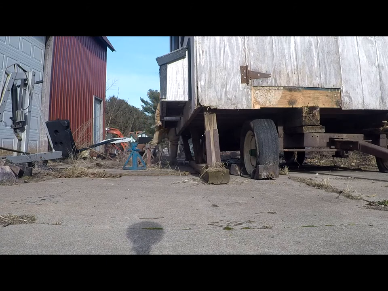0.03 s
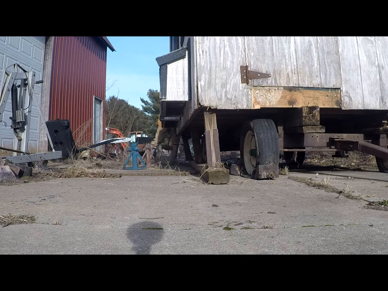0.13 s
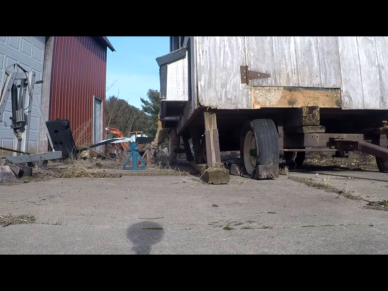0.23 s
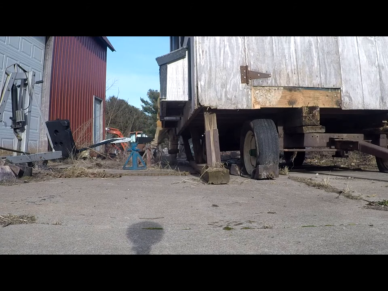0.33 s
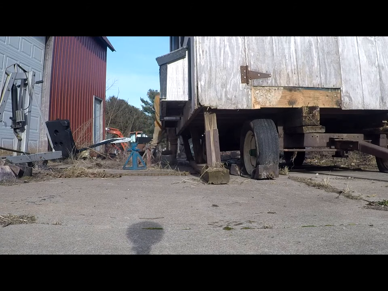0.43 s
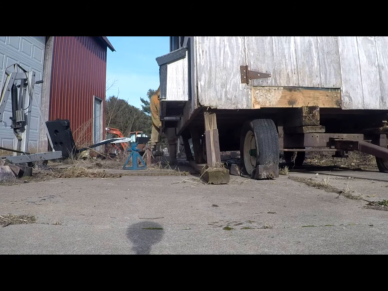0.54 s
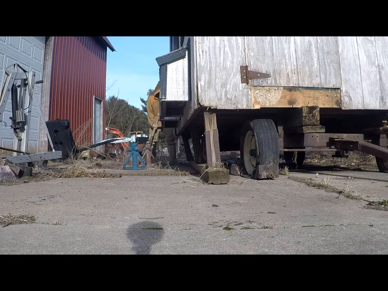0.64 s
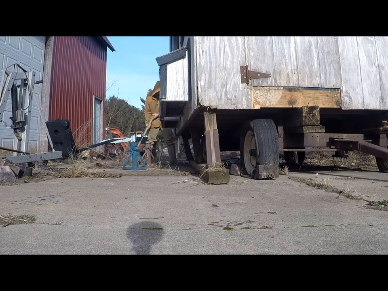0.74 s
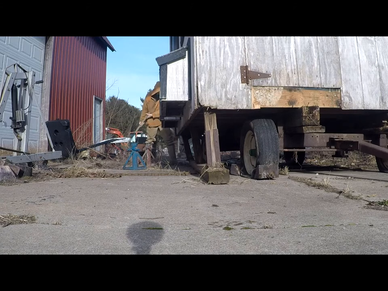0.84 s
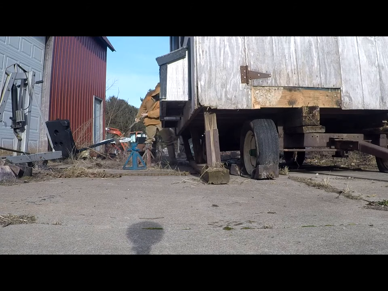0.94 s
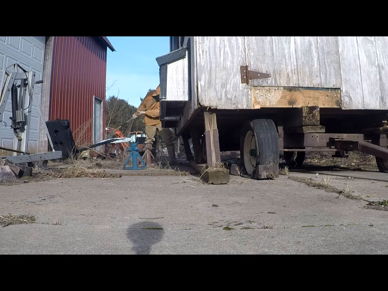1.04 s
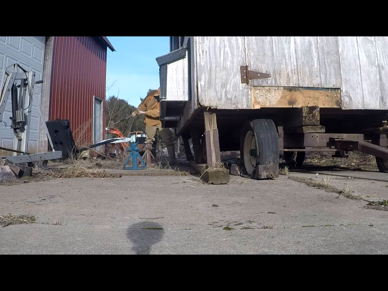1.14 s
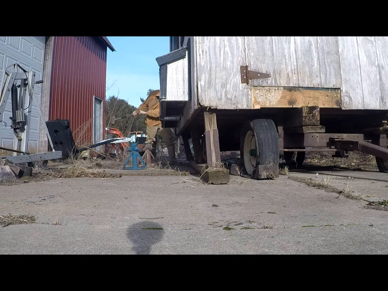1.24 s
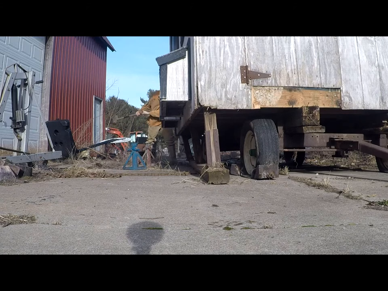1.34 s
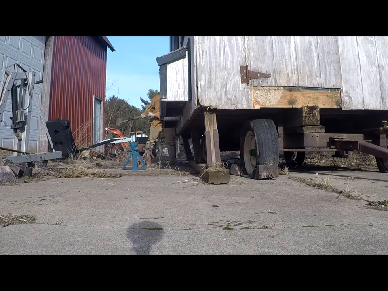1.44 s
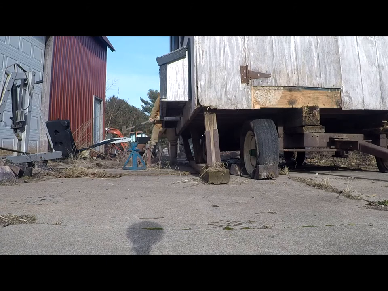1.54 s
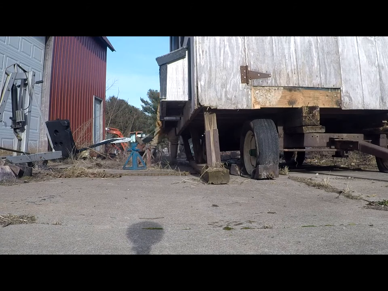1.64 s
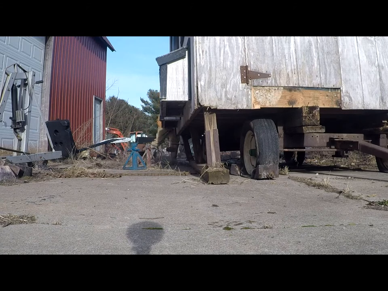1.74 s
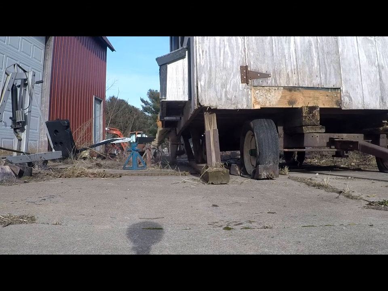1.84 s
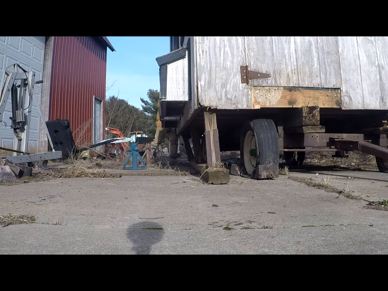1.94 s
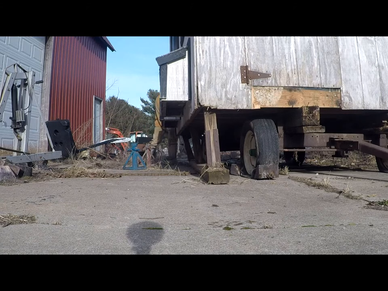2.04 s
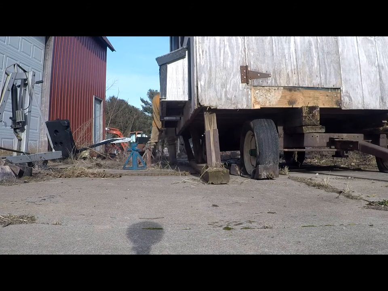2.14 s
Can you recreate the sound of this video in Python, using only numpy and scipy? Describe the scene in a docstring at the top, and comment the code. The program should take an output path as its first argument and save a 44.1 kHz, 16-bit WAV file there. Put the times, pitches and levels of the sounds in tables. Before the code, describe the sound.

A heavy jack clanks under a wooden building in an open yard. Soft hiss and faint ticks lead to a loud, overloaded steel clank with timber thud at 0.25 s, then a bright clink at 0.34 and small rattles at 0.41-0.46. Dull echoes fade; the ducked hiss swells back amid faint ticks from 0.8 to 1.7. A second, slightly softer, bassier clank lands at 1.84 s.

```python
"""Jacking up a wooden building in a farmyard

A long-handled jack lifts the building; twice the load drops onto the catch. Each drop is a low push, then a steel clank
of noise bands and struck modes that shakes the timber and overloads the recorder. Loose parts clink and tick as the
handle is worked, and barns and trees return dull echoes as filtered, scattered copies. The recorder's gain control
ducks at the clanks, so the open-air hiss sinks and, after the first, swells slowly back."""
import sys
import numpy as np
from scipy import signal
from scipy.io import wavfile
from scipy.ndimage import minimum_filter1d

SR = 44100
rng = np.random.default_rng(int(sys.argv[2]) if len(sys.argv) > 2 else 0)


def wrap_up_sound(samples):
    """Save the sound to the file named by the first command line argument, as 16-bit audio."""
    columns = np.atleast_2d(samples).T
    # keep every value between -1 and 1, then stretch to whole-number steps
    tamed = np.clip(columns, -1, 1)
    steps = np.round(tamed * 32767).astype(np.int16)
    wavfile.write(sys.argv[1], SR, steps)


N = 97020
T = np.arange(N) / SR   # seconds


def from_db(db):
    """Decibels to gain."""
    return 10 ** (np.asarray(db) / 20)


def rms_one(x):
    """Scale to unit rms."""
    return x / np.sqrt(np.mean(x ** 2) + 1e-20)


def at_hz(table, hz):
    """Read each column of a table at one frequency, interpolating over log frequency."""
    freqs, *columns = np.transpose(table)
    return [np.interp(np.log(hz), np.log(freqs), column) for column in columns]


def filtered(x, hz, kind, order=2):
    """Butterworth filter."""
    sections = signal.butter(order, np.clip(hz, 1, .45 * SR), kind, fs=SR, output="sos")
    return signal.sosfilt(sections, x + 1e-18)


def noise_bands():
    """Half-octave bands of noise as (centre Hz, band), unit power per octave."""
    edges = 22 * 2 ** (np.arange(20) / 2)
    for low, high in zip(edges, edges[1:]):
        noise = rng.standard_normal(N + SR // 2)
        band = filtered(noise, [low, high], "band", order=3)[-N:]   # drop the filter's settling
        yield np.sqrt(low * high), rms_one(band) / np.sqrt(2)


def dying(start, t60):
    """Envelope that jumps to 1 and falls 60 dB in each t60 seconds."""
    return (T >= start) * np.exp(-np.log(1000) * np.clip((T - start) / t60, 0, 10))


def ring(start, hz, t60):
    """One struck mode: a sine that dies away exponentially."""
    return dying(start, t60) * np.sin(2 * np.pi * hz * (T - start))


def air():
    """Open air at the microphone: steady hiss and rumble over slow swings of pressure."""
    # Each row: frequency in Hz, level in dB per octave band.
    air_spectrum = [(30, -52), (70, -48), (150, -47), (300, -53.5), (600, -53.5), (1200, -53.5),
                    (2400, -55), (4800, -58), (9000, -58), (15000, -60.5)]
    sway_db, sway_hz = -26.5, 6.3   # rms level, upper edge
    hiss = sum(from_db(at_hz(air_spectrum, hz)[0]) * band for hz, band in noise_bands())
    sway = rms_one(filtered(rng.standard_normal(2 * N), sway_hz, "low", order=3)[N:])
    return hiss + from_db(sway_db) * sway


def linkage():
    """Brief rubs of the linkage, and one ring of the handle: dying noise, each passed twice through one
    resonance."""
    # Small ticks and scrapes, and at 0.408 s the handle's ring near 2.4 kHz. Each row: start in seconds, level
    # in dB, centre in Hz, # sharpness Q of each pass (no lower than 0.5), t60 in seconds.
    ticks = [(0.0775, -39, 1760, 1.4, 0.08), (0.095, -47, 2340, 2, 0.3), (.135, -46, 3120, 13, 0.11),
             (.407, -27.5, 7950, 2.6, 0.13), (.408, -20, 2430, 1.7, 0.27), (.803, -68, 7500, 1.5, 0.045),
             (.829, -46.5, 5000, 0.73, 0.032), (.921, -47, 13600, 35, 0.087),
             (1.052, -42, 3663, 0.51, 0.08), (1.055, -50, 8500, 8.7, 0.091), (1.0754, -40, 3370, 0.86, .03),
             (1.1294, -60, 14200, 20, .08), (1.188, -43, 2930, 7.3, 0.047), (1.3535, -49, 6100, .7, 0.077),
             (1.365, -45, 2660, 3.3, 0.16), (1.4024, -39.5, 1750, 2.3, 0.11),
             (1.427, -48.5, 2350, 1.1, 0.055), (1.679, -43.5, 2040, 1.24, 0.14)]
    out = np.zeros(N)
    for start, db, hz, q, t60 in ticks:
        peak = signal.iirpeak(hz, max(q, .5), fs=SR)
        once = signal.lfilter(*peak, rng.standard_normal(N))
        rub = signal.lfilter(*peak, once)
        out += from_db(db) * dying(start, t60) * rms_one(rub)
    return out


def clank(start, level_db, tilt_db, bass_db, mid_db, mid_hz, rebound_s):
    """A low push, the crack of steel, then the modes of jack and timber dying away into the yard."""
    # Dense ringing of jack and timber.
    # Each row: frequency in Hz, level in dB per octave band before the blow's colour, t60 in seconds.
    body = [(40, -6.5, .55), (71, -6, 0.36), (129.6, -2, .42), (270, 1, 0.39), (520, -0.5, 0.27),
            (1100, 0.5, 0.24), (1970, -4, 0.29), (4430, -7, .255), (8200, -9.5, 0.21), (11000, -21, 0.2),
            (15000, -29, .2)]
    # Lingering sound of the yard. Each row: the same columns as the body.
    yard = [(40, -25, 2.2), (140, -21.5, 1.78), (300, -24, 1.1), (970, -28.5, 0.59), (3000, -31, 0.25),
            (8000, -41.5, .5), (15000, -54, .4)]
    # Strongest modes of the loaded jack.
    # Each row: frequency in Hz, mean level in dB before the blow's colour, t60 in seconds.
    jack_modes = [(98.2, 1, .35), (217.1, 7, 0.37), (277.1, 24, 0.11), (304.9, 12.5, .2), (354, 10, 0.22),
                  (459.5, 11, 0.15), (517.2, 5.5, .17), (585, 10.5, 0.16), (684.6, 7.5, 0.17),
                  (811.8, 3.5, 0.16), (947.7, 1.5, .2), (980, 5, 0.095), (1027.2, 9.5, 0.12),
                  (1104, 9, .18), (1159.5, 8, 0.14), (1545, 1.5, .19), (1951, 1, 0.18), (2227, 2.5, .2),
                  (2606, -6, 0.067)]
    crack_db, crack_t60_s, crack_hz = 4.5, .04, 1100   # steel on steel
    push_lead_s, push_hz, push_db = .0075, 205, -3.5   # the frame gives just before the blow
    rebound_db = -0.5   # the load bounces and strikes again
    rise_cycles = 0.53   # build-up time constant, so deep resonances take longer
    boom_rise_s = 0.015   # the timber takes a moment to swing
    ring_hz, ring_db, ring_t60_s = 7510, -51, 2

    def colour(hz):
        """How hard this blow excites one frequency."""
        treble = tilt_db * np.log2(max(hz / crack_hz, 1))
        bass = bass_db * (hz < push_hz)
        mid = mid_db * np.exp(-np.log2(hz / mid_hz) ** 2)
        return from_db(treble + bass + mid)

    age = np.maximum(T - start, 0)
    crack = rms_one(filtered(rng.standard_normal(N), [crack_hz / 2, crack_hz * 2], "band"))
    out = from_db(crack_db) * dying(start, crack_t60_s) * crack

    for hz, band in noise_bands():
        body_db, body_t60 = at_hz(body, hz)
        yard_db, yard_t60 = at_hz(yard, hz)
        rebound = from_db(rebound_db) * dying(start + rebound_s, body_t60)
        struck = np.hypot(dying(start, body_t60), rebound)
        decay = np.hypot(from_db(body_db) * struck, from_db(yard_db) * dying(start, yard_t60))
        rise = 1 - np.exp(-age * hz / rise_cycles)
        out += colour(hz) * band * decay * rise

    swing = 1 - np.exp(-age / boom_rise_s)
    for k, (hz, db, t60) in enumerate(jack_modes):
        mode_gain = from_db(db + rng.normal(0, 1))
        out += (-1) ** k * colour(hz) * mode_gain * swing * ring(start, hz, t60)   # alternating polarity

    lead = np.maximum(T - start + push_lead_s, 0)
    push_envelope = np.minimum(lead / push_lead_s, 1) * np.exp(-age / push_lead_s)
    out += from_db(push_db) * push_envelope * np.sin(2 * np.pi * push_hz * lead)
    out += from_db(ring_db) * ring(start, ring_hz, ring_t60_s)
    return from_db(level_db) * out


def clanks():
    """The load drops onto the catch, each drop with its own weight and colour."""
    # Each row: start in seconds, level in dB, treble tilt in dB per octave, bass ring in dB,
    # mid ring in dB, centre of the mid ring in Hz, rebound delay in seconds.
    drops = [(0.2520, 0.5, 1, -0.5, -1, 480, .009), (1.8444, -2.5, 0.5, 2.5, 1.5, 527, 0.011)]
    return sum(clank(*row) for row in drops)


def clinks(hits, modes, contact_hz):
    """A small steel part: a short rattling contact and its ringing modes."""
    contact_db, contact_t60_s = -3, 0.077   # level of the noise before its band filter
    out = np.zeros(N)
    for start, db in hits:
        rattle = filtered(rng.standard_normal(N), [contact_hz / 2, contact_hz * 2], "band")
        contact = from_db(contact_db) * dying(start, contact_t60_s) * rattle
        ringing = sum(from_db(mode_db) * ring(start, hz, t60) for hz, mode_db, t60 in modes)
        out += from_db(db) * (contact + ringing)
    return out


def catch():
    """The catch drops in and rings as a small steel part."""
    # Each row: start in seconds, level in dB.
    catch_hits = [(.3401, -6.5)]
    # Each row: frequency in Hz, level in dB relative to the hit, t60 in seconds.
    catch_modes = [(3110, -10.5, 0.14), (3580, -15, .18), (4500, -4, 0.14), (4585, -2.5, 0.098),
                   (6465, -17, 0.17), (8540, -2.5, 0.05), (8790, -6.5, 0.13), (12000, -13, 0.17),
                   (12400, -9, .13), (13870, -23, 0.2)]
    return clinks(catch_hits, catch_modes, contact_hz=6450)


def handle():
    """The handle knocks in its socket and rings in a few modes."""
    # Each row: start in seconds, level in dB.
    handle_hits = [(.4075, -27), (.4628, -18.5), (.7165, -43.5)]
    # Each row: frequency in Hz, level in dB relative to the hit, t60 in seconds.
    handle_modes = [(2753, -12.5, 0.41), (4150, -8.5, 0.11), (5320, -7.5, 0.083)]
    return clinks(handle_hits, handle_modes, contact_hz=3130)


def echoes(x):
    """Each far surface returns a dull copy, scattered by a dying burst of noise."""
    # Far walls and trees. Each row: delay in seconds, level in dB before the band edges are cut,
    # low edge in Hz, high edge in Hz, scatter t60 in seconds.
    far_surfaces = [(.266, -35, 480, 1200, 0.11), (0.347, -42.5, 950, 1900, 0.078),
                    (.408, -38.5, 480, 890, .24), (0.523, -50.5, 680, 1400, .07),
                    (.615, -38, 418, 592, 0.29), (.665, -35, 110, 190, 0.27), (.768, -38.5, 430, 604, .2),
                    (.8, -38.5, 109.8, 190, 0.17), (0.888, -49, 400, 500, .3)]
    response = np.zeros(N)
    for delay, db, low_hz, high_hz, t60 in far_surfaces:
        scatter = rng.standard_normal(N) * dying(delay, t60)
        scatter /= np.linalg.norm(scatter)   # unit energy
        dulled = filtered(scatter, high_hz, "low")
        response += from_db(db) * filtered(dulled, low_hz, "high")
    return signal.fftconvolve(x, response)[:N]


def scene():
    """Open air, jack and echoes as they reach the microphone; only the clanks are echoed."""
    blows = clanks()
    return (air() + linkage() + blows + catch() + handle() + echoes(blows))[None]


def gain_control(x):
    """Loud peaks pull the gain down; it holds, then creeps back."""
    threshold_db, depth_db = 2, 21.5   # depth is the deepest cut
    attack_s, hold_s, release_s = .0095, 0.26, .38
    level_db = 20 * np.log10(np.abs(x) + 1e-9)
    excess = np.clip(level_db - threshold_db, 0, depth_db)
    # Running maximum over the hold time just past
    hold = 2 * int(hold_s * SR / 2) + 1
    held = -minimum_filter1d(-excess, hold, origin=hold // 2, mode="constant")
    # The cut in dB decays exponentially unless a louder peak renews it
    fade = np.exp(-T / release_s)
    cut_db = np.maximum.accumulate(held / fade) * fade
    pole = np.exp(-1 / (attack_s * SR))
    return x * from_db(-signal.lfilter([1 - pole], [1, -pole], cut_db))


def record(dry):
    """The recorder: gain control, soft overload on the clanks, and a steep top cut."""
    ceiling, cutoff_hz = .87, 15300   # ceiling as a fraction of full scale
    x = gain_control(dry[0]) / ceiling
    clipped = ceiling * x / (1 + x ** 4) ** (1 / 4)
    top_cut = signal.firwin(161, cutoff_hz, window="blackman", fs=SR)
    return signal.fftconvolve(clipped, top_cut, "same")[None]


dry = scene()
out = record(dry)
wrap_up_sound(out)
```